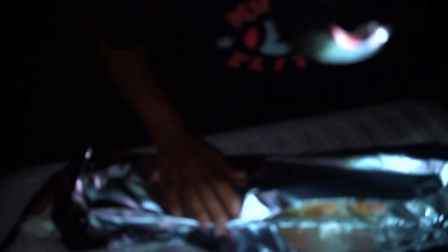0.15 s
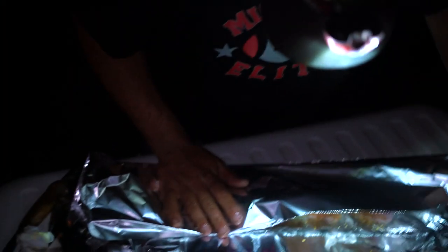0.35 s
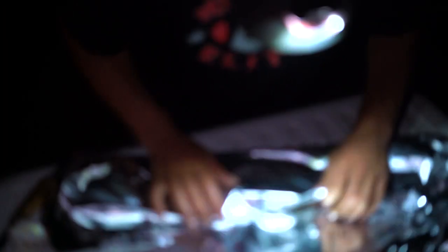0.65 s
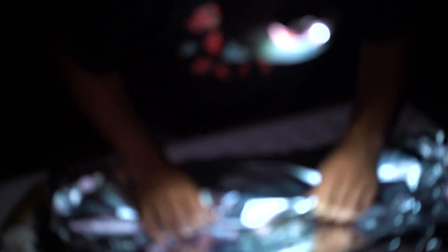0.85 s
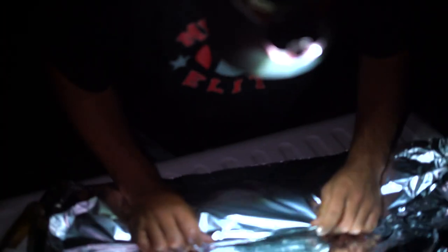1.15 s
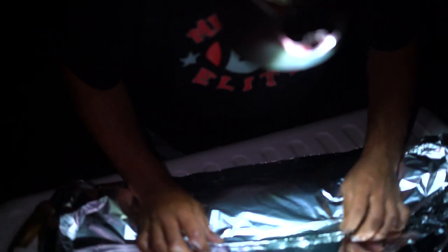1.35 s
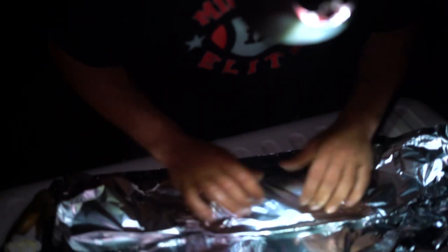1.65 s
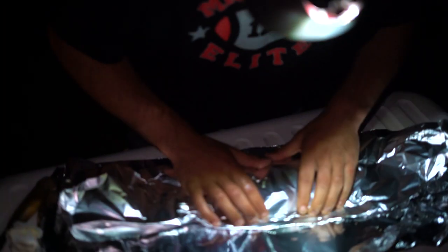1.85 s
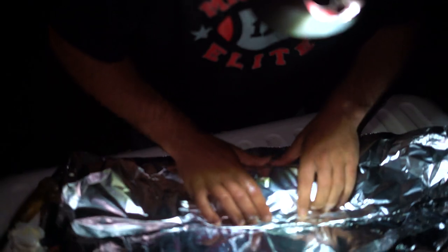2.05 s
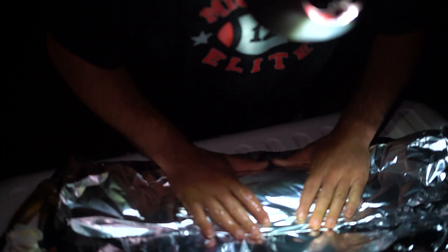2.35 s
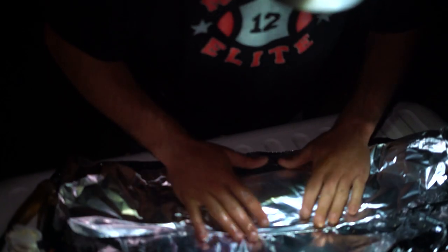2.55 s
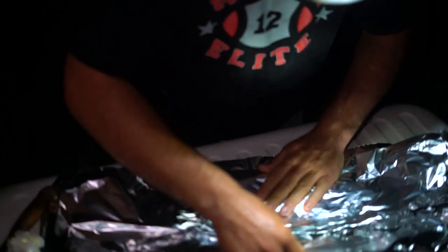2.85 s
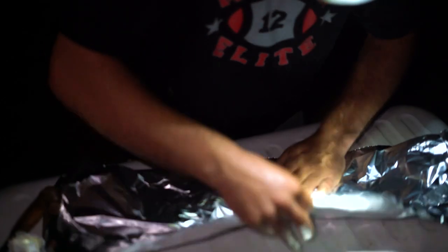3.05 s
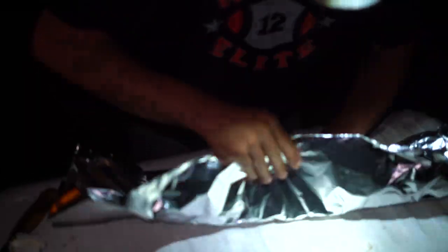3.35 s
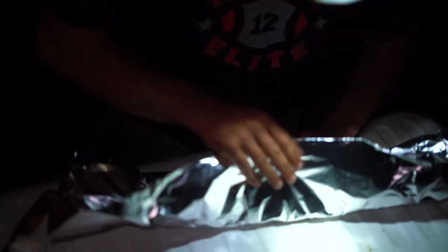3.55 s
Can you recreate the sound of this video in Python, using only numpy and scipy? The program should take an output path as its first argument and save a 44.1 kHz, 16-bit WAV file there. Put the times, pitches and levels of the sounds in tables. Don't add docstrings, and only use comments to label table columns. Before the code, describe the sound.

Aluminium foil crinkles close up, opening with a strong, slightly dull burst around 0.2 s. A second fold runs from 0.6 to 1.6 s with snaps and dense pinches. Gentler, brighter crackles follow from 1.75 s, peaking near 2.3 s and thinning almost to silence at 2.7 s. A brisk, crisp fold returns at 2.85 s, snapping sharply near 3.3 s. Soft sheet flexing and faint night hum lie underneath.

```python
import sys
import numpy as np
from scipy import signal
from scipy.fft import rfft, irfft, next_fast_len
from scipy.io import wavfile
from scipy.ndimage import uniform_filter1d, map_coordinates

SR = 44100
rng = np.random.default_rng(int(sys.argv[2]) if len(sys.argv) > 2 else 0)


def dump_mix(stems):
    frames = np.atleast_2d(stems).T
    limited = np.clip(frames, -1, 1)
    pcm = np.round(limited * 32767).astype(np.int16)
    wavfile.write(sys.argv[1], SR, pcm)


def magnitude_from_level(level_db):
    exponent = np.asarray(level_db, float) / 20
    return 10 ** exponent


N = 163170

# f/Hz, level/dB
NIGHT_COLOUR = [(25, -21), (60, -11), (130, -7.5), (300, -3.5), (600, -3.5), (2000, -4.5), (6000, -46),
                (11000, -39)]
# f/Hz, likeness (0-1)
NIGHT_LIKENESS = [(60, .95), (300, 0.98), (1500, 0.18)]
# t/s, effort level/dB, dullness/dB, left-right/dB
EARLY_FOLDS = [
    [(0, -32.5, 2.5, -1.5), (.09, -21, 3.5, -5), (.17, -16.5, 2, -3.5), (.215, -21.5, 2, -3.5),
     (.27, -28.5, 4.5, -4.5), (.38, -30.5, 3, -4), (.44, -37, 4.5, -2.5), (.54, -26.5, 3, -1),
     (.595, -35.5, 17, 0)],
    [(.61, -24, 3, -3), (.74, -26.5, 3.5, -2), (.95, -18.5, -0.5, -1.5), (1.07, -30, 2, -1.5),
     (1.24, -25.5, 2.5, -2.5), (1.34, -26, 0.5, -1.5), (1.6, -28.5, -1.5, -2.5), (1.645, -43.5, 6, 5.5),
     (1.75, -46, 1, 1.5)],
]
LATE_FOLDS = [
    [(1.77, -27, -2, -2.5), (1.86, -32.5, 1, -0.5), (1.94, -38.5, 1, -2.5), (2.11, -36, 1, -1.5),
     (2.22, -25, 0.24, -1.5), (2.47, -41, 1, -2.5), (2.63, -32.5, 0.73, -0.5), (2.7, -71, 0.84, 0),
     (2.815, -51.5, 1, 3)],
    [(2.85, -19, -3.5, -1.5), (2.95, -27, -1, -1.1), (3.02, -24.5, 1, 0), (3.1, -29, 1, -1.5),
     (3.25, -24.5, 1.5, -1.5), (3.42, -29, 2, -2), (3.55, -29.5, 3.5, -2), (3.585, -39, 4, 0.5),
     (3.7, -29.5, 10, -2.5)],
]
# start t/s, hold/s, level/dB, dullness/dB
FINGER_PINCHES = [(0.019, .006, -29, 3), (0.188, 0.0073, -30, 3), (0.29, .004, -27.5, 2),
                  (0.327, 0.008, -25, 10), (.452, 0.0046, -36, 0), (0.492, 0.008, -29.5, -2),
                  (0.522, .006, -33.5, -2), (0.6, 0.038, -20, -0.5), (0.633, 0.0095, -24, -11),
                  (0.753, .008, -21.5, 0), (0.786, 0.009, -25.5, 1), (0.875, .015, -23, 6),
                  (0.7, .012, -23.5, -1), (0.927, 0.0074, -27, -1), (0.973, 0.024, -23, -2),
                  (1.087, 0.0061, -30, 1), (1.153, 0.022, -36, 2), (1.204, 0.013, -28, 6),
                  (1.352, .01, -37, 3), (1.409, 0.059, -24.5, 1.5), (1.543, 0.044, -25.5, -1.5),
                  (1.645, 0.014, -32.5, 1), (1.673, 0.033, -35.5, -1.5), (1.757, 0.04, -21, -3),
                  (1.78, 0.029, -20.5, -1), (1.87, 0.0035, -36, 4), (1.985, 0.0093, -24.5, -3.5),
                  (2.036, .006, -28.5, 2), (2.075, 0.011, -29.5, -0.5), (2.115, 0.0051, -28, 3.5),
                  (2.147, .003, -26, 1), (2.164, .008, -31, 13), (2.18, 0.0071, -22.5, 1),
                  (2.238, .004, -31, 2), (2.294, 0.021, -16.5, -1), (2.371, 0.014, -30, 3),
                  (2.415, 0.0034, -36, 3), (2.51, 0.006, -37, 4), (2.553, 0.004, -27.5, -2.5),
                  (2.612, 0.022, -28.5, -2.5), (2.703, 0.003, -38.5, 2.5), (2.823, 0.03, -26, -4.5),
                  (2.959, 0.0093, -20, -3.5), (3.025, 0.018, -22.5, -1), (3.107, 0.016, -24, 2),
                  (3.202, 0.014, -32.5, -2), (3.258, 0.006, -26.5, -4), (3.359, 0.0044, -25.5, 1),
                  (3.466, .004, -29, 5), (3.61, .004, -30, 3), (3.69, .006, -31, 0)]
# t/s, level/dB
LOOSENESS = [
    (0, 2.5),
    (.25, -0.5),
    (.7, -4.5),
    (2.7, -2.5),
    (2.95, 4),
    (3.7, 3.5),
]
# t/s, f/Hz, level/dB
SAG_GLIDE = [
    (2.5, 363, -70),
    (2.569, 343, -58.5),
    (2.64, 269.6, -69),
    (2.68, 251, -63),
    (2.78, 227, -62),
    (2.84, 222, -59),
    (2.88, 216.6, -75),
]
# t/s, peak level/dB
FACET_TICKS = [(0.0094, -17), (0.034, -13), (0.3035, -16), (0.4545, -24), (0.6095, -10), (0.6922, -13),
               (0.7751, -8), (1.0526, -13), (1.0869, -14), (1.15, -16), (1.1999, -14), (1.4167, -10),
               (1.4359, -9), (1.5101, -13), (1.6641, -11), (1.6874, -20), (1.8942, -17), (1.9092, -23),
               (1.9283, -24), (1.9768, -19), (1.9995, -10), (2.0307, -17), (2.0825, -19), (2.102, -15),
               (2.1213, -18), (2.1325, -16), (2.1525, -13), (2.1932, -9), (2.2615, -12), (2.2916, -16),
               (2.3581, -12), (2.4256, -19), (2.4628, -21), (2.4771, -24), (2.4844, -23), (2.4954, -23),
               (2.5059, -18), (2.5243, -23), (2.5306, -21), (2.5645, -16), (2.6029, -19), (2.6716, -24),
               (2.718, -27), (2.7978, -38), (3.0245, -10), (3.1866, -14), (3.2504, -13), (3.2671, -8),
               (3.298, -15), (3.3296, -9), (3.3999, -17), (3.4443, -12), (3.4739, -16), (3.5099, -13),
               (3.6239, -17), (3.6903, -18)]
# t/s, peak level/dB, ring f/Hz, ring over crack/dB
CREASE_SNAPS = [(.345, -20.5, 1610, 10.5), (0.565, -20, 1300, 5), (.69, -17, 2020, 5.5),
                (0.803, -16.5, 2280, 6), (1.228, -19, 2630, 6.5), (1.6637, -23, 1560, 1),
                (1.894, -22.5, 2240, 1), (3.186, -24, 2310, 2), (3.266, -9.5, 2390, -4),
                (3.328, -14, 1950, 1), (3.38, -24, 2300, 6), (3.509, -25, 1760, 10), (3.62, -27, 2830, 7),
                (3.688, -17, 1400, -1)]
# t/s, level/dB
SNAP_THUMPS = [
    (.567, -25.5),
    (1.6641, -26.5),
    (3.69, -37),
]
# f/Hz, time to fall 60 dB/s
FACET_RING = [(500, 0.02), (3000, 0.031), (11000, 0.022)]
# f/Hz, level/dB
FOIL_COLOUR = [(150, -33), (250, -33.5), (711, -16.5), (887, -20.5), (1160, -10), (2480, -1.5), (3990, -1),
               (6220, 0), (11000, -1), (14300, -19), (22000, -120)]
# f/Hz, width/Hz, level/dB
FOIL_PEAKS = [(1100, 220, 4), (2476, 80, 3), (6000, 990, 2.5)]
# f/Hz, share of the dullness (ratio)
DULL_TILT = [(700, 1.5), (2000, 0.77), (5000, -0.37), (10000, -0.87)]
# f/Hz, likeness (0-1)
FOIL_LIKENESS = [(60, 0.86), (220, 0.99), (840, 0.78), (3120, 0.71), (11600, 0.31)]
# f/Hz, left-right/dB
STEREO_LEAN = [(300, -1.5), (900, 2), (2500, -0.5), (8000, -0.5)]


def unit(x):
    return x / np.sqrt(np.mean(x ** 2) + 1e-20)


def along(points, hz):
    f, value = np.transpose(points)
    return np.interp(np.log(hz + 1), np.log(f + 1), value)


def wobble(rate):
    knots = rng.standard_normal(int(N * rate / SR) + 4)
    return map_coordinates(knots, [np.arange(N) * rate / SR])


def filtered(x, response):
    size = next_fast_len(N + 8192)
    hz = np.fft.rfftfreq(size, 1 / SR)
    return irfft(rfft(x, size) * response(hz), size)[..., :N]


def high_pass(x, hz_cut, order=2):
    return filtered(x, lambda hz: hz ** order / (hz ** order + hz_cut ** order))


def spread(pair, alike):
    def middle_and_side(hz):
        turn = np.arccos(np.clip(along(alike, hz), -1, 1)) / 2
        return np.array([np.cos(turn), np.sin(turn)])
    mid, side = filtered(pair, middle_and_side)
    return np.array([mid + side, mid - side])


def night():
    air = filtered(rng.standard_normal((2, N)), lambda hz: magnitude_from_level(along(NIGHT_COLOUR, hz)))
    level_db = -52.5 + .5 * wobble(6) + 1.5 * wobble(30)
    return magnitude_from_level(level_db) * unit(spread(air, NIGHT_LIKENESS))


def effort():
    rise_s, fall_db_per_s = 0.0075, 367
    t = np.arange(N) / SR
    s, level_db, dull_db, pan_db = np.concatenate(EARLY_FOLDS + LATE_FOLDS).T
    power = magnitude_from_level(2 * np.interp(t, s, level_db))
    weighted = power * np.interp(t, s, dull_db)
    for start, hold, db, pinch_dull_db in FINGER_PINCHES:
        rise = np.clip((t - start) / rise_s, 0, 1) ** 2
        fall_s = np.clip(t - start - rise_s - hold, 0, 1)
        pinch = (rise * magnitude_from_level(db - fall_db_per_s * fall_s)) ** 2
        power = power + pinch
        weighted = weighted + pinch * pinch_dull_db
    return np.sqrt(power), weighted / power, np.interp(t, s, pan_db)


def flex():
    strikes_per_s, low_hz, high_hz, t60_s = 110, 243, 1094, .09
    rows = rng.random((round(strikes_per_s * N / SR), 5))
    t = np.arange(3000) / SR
    start = (rows[:, 0] * N).astype(int)
    hz = low_hz * (high_hz / low_hz) ** rows[:, 1:2]
    loose_db = np.interp(start[:, None] / SR, *np.transpose(LOOSENESS))
    level_db = -37 + loose_db + 5.6 * rows[:, 2:3] + 2 * np.log2(hz / 500)
    size = effort()[0][start, None] ** 0.46 * magnitude_from_level(level_db)
    envelope = magnitude_from_level(-60 * t / t60_s) * (1 - np.exp(-t / 0.005))
    drift = 1 + 2.0 * (rows[:, 3:4] - .5) * t
    tone = size * envelope * np.sin(2 * np.pi * hz * t * drift)
    at = (start[:, None] + np.arange(len(t))).ravel()
    gains = 1 - 0.17 * rows[:, 4:], 0.33 + 0.34 * rows[:, 4:]
    return np.array([np.bincount(at, (tone * gain).ravel(), N)[:N] for gain in gains])


def sag():
    s, pitch_hz, db = np.transpose(SAG_GLIDE)
    t = np.arange(N) / SR
    level_db = np.interp(t, s, db, -120, -120) + 3 + 1.2 * wobble(25.1)
    cycles = np.cumsum(np.interp(t, s, pitch_hz)) / SR
    return magnitude_from_level(level_db) * np.sin(2 * np.pi * cycles)


def ticks():
    click_s, rattle_t60_s, rattle_db = .00003, .03, -7.5
    out, t = np.zeros((2, N + SR)), np.arange(1200) / SR
    u = (t - .0005) / click_s
    for s, db in FACET_TICKS:
        side, sign = rng.uniform(-1.2, 1, size=2)
        click = np.sign(sign) * u * np.exp(.5 - u ** 2 / 2) * [[1], [.4 * side]]
        noise = rng.standard_normal((2, len(t)))
        rattle = magnitude_from_level(rattle_db - 60 * t / rattle_t60_s) * (u > 0) * noise
        out[:, round(s * SR) - 22:][:, :len(t)] += magnitude_from_level(db) * (click + rattle)
    return spread(high_pass(out[:, :N], 1800), FOIL_LIKENESS) * magnitude_from_level([[-1], [1]])


def creases():
    crack_t60_s, ring_t60_s = 0.026, 0.021
    out, t = np.zeros((2, N + SR)), np.arange(1500) / SR
    for s, db, hz, ring_db in CREASE_SNAPS:
        noise = 0.97 * rng.standard_normal((2, len(t)))
        crack = noise * magnitude_from_level(-60 * t / crack_t60_s) * (1 - np.exp(-t / 0.00047))
        envelope = magnitude_from_level(ring_db - 60 * t / ring_t60_s) * (1 - np.exp(-t / 0.0011))
        ping = envelope * np.sin(2 * np.pi * hz * t)
        out[:, round(s * SR):][:, :len(t)] += magnitude_from_level(db) * (crack + ping * [[1], [.4]])
    return high_pass(out[:, :N], 1300)


def thumps():
    thump_s = 0.00031
    s, db = np.transpose(SNAP_THUMPS)
    u = (np.arange(N) / SR - s[:, None]) / thump_s
    pulse = (1 - u ** 2) * np.exp(-u ** 2 / 2)
    return magnitude_from_level(db) @ pulse * [[1], [.3]]


def snaps():
    return spread(creases() + thumps(), FOIL_LIKENESS)


def ring(size, place):
    favour_peak_db, width_octaves = 6, 0.39
    head_share = .2
    hz, t, z = signal.stft(rng.standard_normal((2, size)), SR, nperseg=64)
    octaves_away = np.log2((hz + 1) / (1100 * 11 ** place))
    favour_db = favour_peak_db * np.exp(-(octaves_away / width_octaves) ** 2)
    fade_db = 60 * t / along(FACET_RING, hz)[:, None]
    tail = signal.istft(z * magnitude_from_level(favour_db[:, None] - fade_db), SR, nperseg=64)[1]
    tail = tail / np.linalg.norm(tail, axis=1, keepdims=True)
    head = (np.arange(tail.shape[1]) == 0) * rng.choice([-1, 1], size=(2, 1))
    return np.sqrt(1 - head_share) * tail + np.sqrt(head_share) * head


def pops(gain, patches):
    pops_per_s, size_spread_db = 3500, 3
    chance = rng.random((3, N))
    bunching_db = .4 * wobble(45) + 1.3 * wobble(200)
    size_db = -size_spread_db * np.log(chance[1] + 0.017) + bunching_db
    size = unit((chance[0] < pops_per_s / SR) * magnitude_from_level(size_db)) * gain
    patch = (chance[2] * patches).astype(int)
    pair = np.zeros((2, N))
    for k in range(patches):
        hits = (size * (patch == k))[None]
        pair += signal.fftconvolve(hits, ring(size=2048, place=k / patches), axes=1)[:, :N]
    return pair


def foil_colour(hz):
    peaks_db = sum(db * np.exp(-((hz - c) / w) ** 2) for c, w, db in FOIL_PEAKS)
    return magnitude_from_level(along(FOIL_COLOUR, hz) + peaks_db)


def crinkle():
    gain, dull_db, pan_db = effort()
    pair = pops(gain, patches=18)
    norm = 1 / np.sqrt(np.mean(foil_colour(np.linspace(0, SR / 2, 999)) ** 2))

    def tilted(way_db):
        return filtered(pair, lambda hz: norm * foil_colour(hz) * magnitude_from_level(way_db * along(DULL_TILT, hz)))
    share = np.clip(.5 + dull_db / 10, 0, 1)
    rustle = spread(share * tilted(5) + (1 - share) * tilted(-5), FOIL_LIKENESS)
    leaned = filtered(rustle, lambda hz: magnitude_from_level(np.outer([.5, -.5], along(STEREO_LEAN, hz))))
    return leaned * magnitude_from_level(np.outer([.5, -.5], pan_db))


def scene():
    ceiling = 0.36
    foil = crinkle() + snaps() + ticks()
    foil = foil / (1 + np.abs(foil / ceiling) ** 4) ** (1 / 4)
    return high_pass(foil, 220, order=4) + flex() + sag() + night()


def band_limit(x):
    return signal.sosfilt(signal.butter(12, 12250, fs=SR, output="sos"), x)


def record(dry):
    duck_db_per_db, threshold_db, top_hz = .5, -23, 10950
    power = np.abs(uniform_filter1d(np.mean(dry ** 2, 0), size=1500))
    over_db = np.clip(10 * np.log10(power + 1e-9) - threshold_db, 0, 30)
    bass = filtered(dry, lambda hz: 1 / (1 + (hz / 450) ** 4))
    wet = dry + bass * (magnitude_from_level(-duck_db_per_db * over_db) - 1)

    def band(hz):
        top_cut_db = np.clip((hz - top_hz) / 4, 0, 45 + hz / 2000)
        return hz ** 2 / (hz ** 2 + 45 ** 2) * magnitude_from_level(-top_cut_db)
    return band_limit(filtered(wet, band))


dry = scene()
out = record(dry)
dump_mix(out)
```